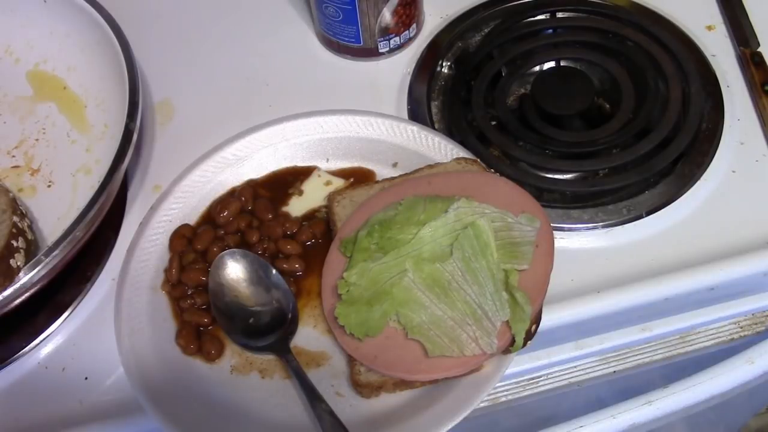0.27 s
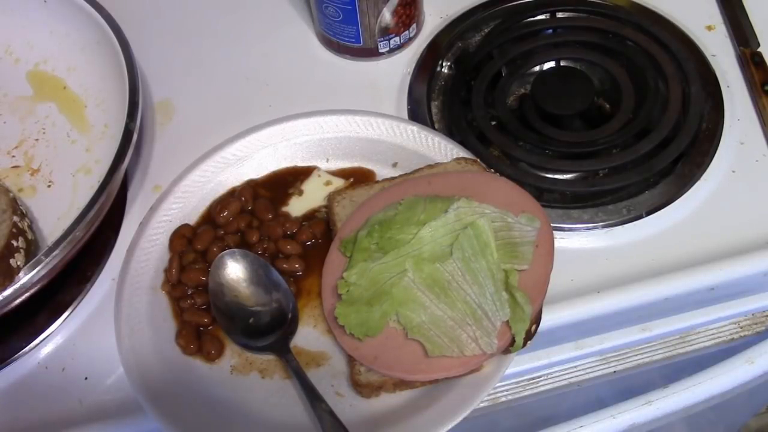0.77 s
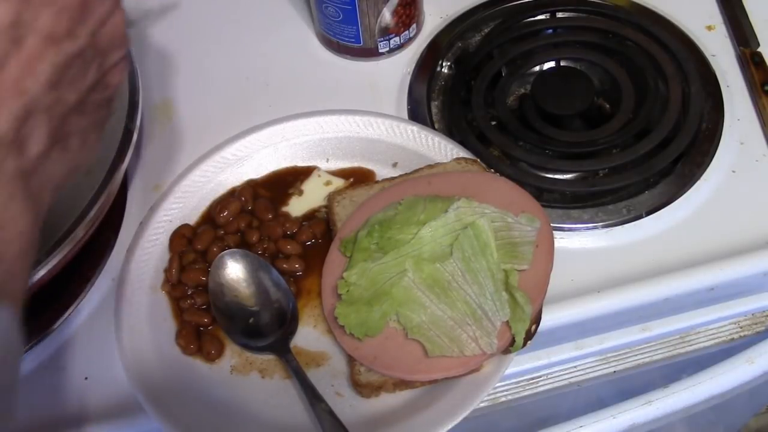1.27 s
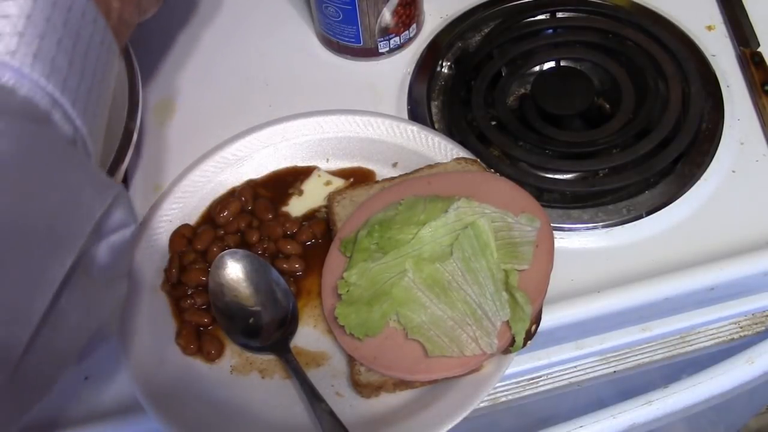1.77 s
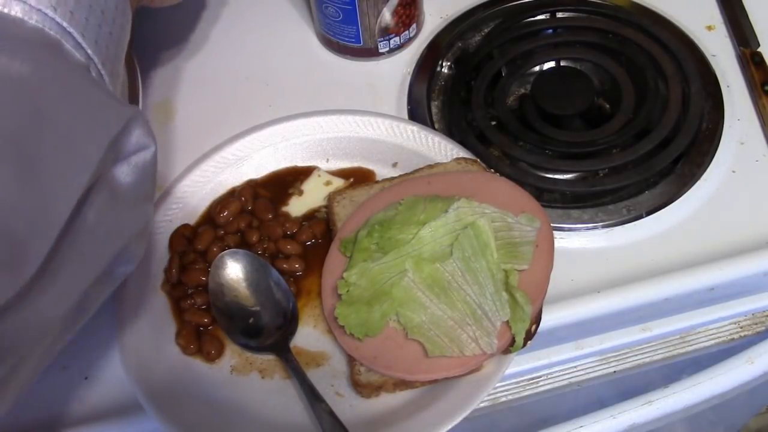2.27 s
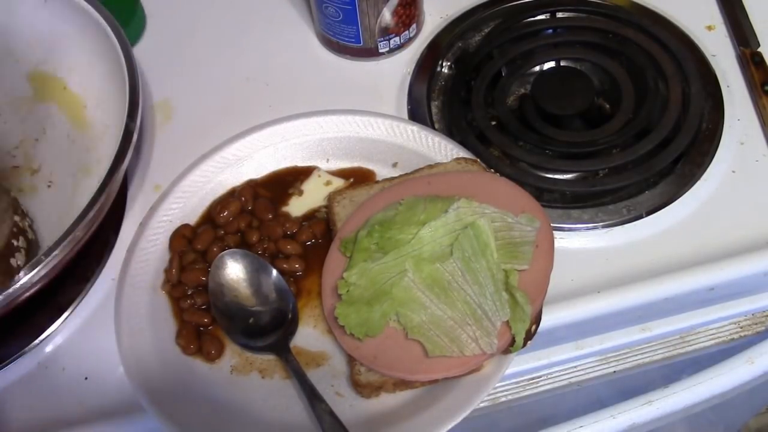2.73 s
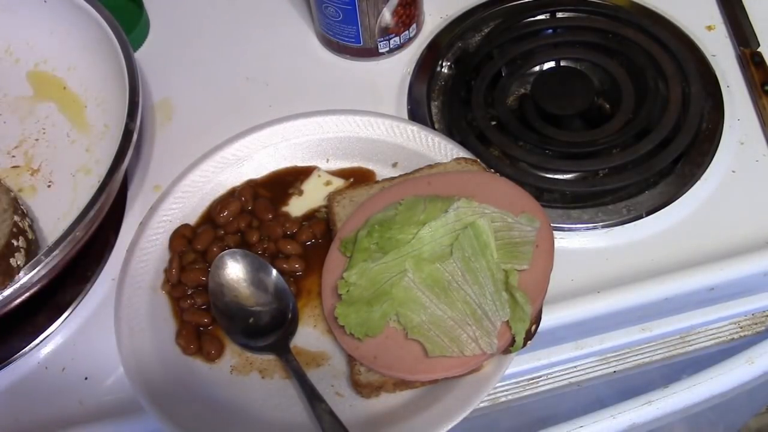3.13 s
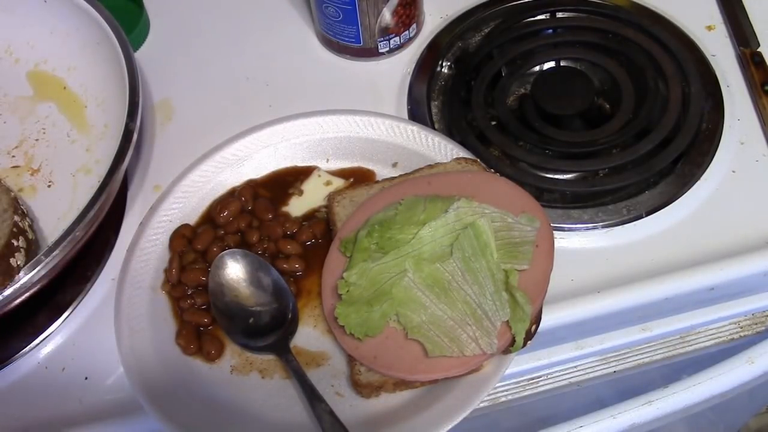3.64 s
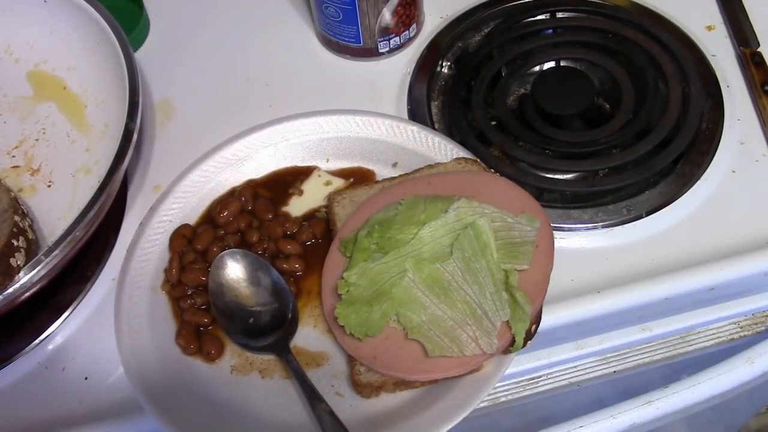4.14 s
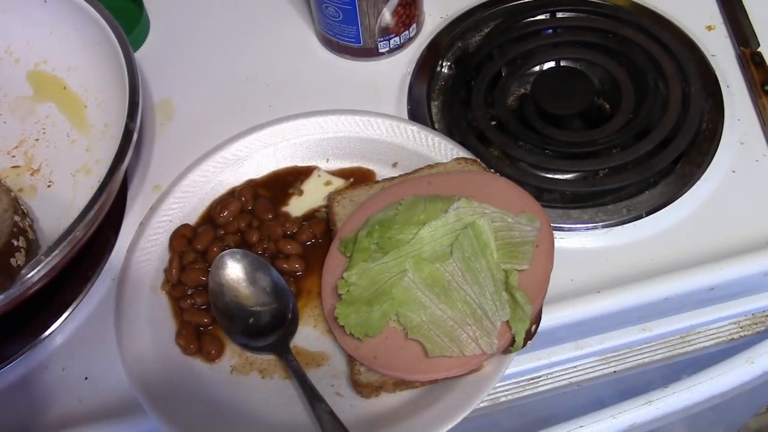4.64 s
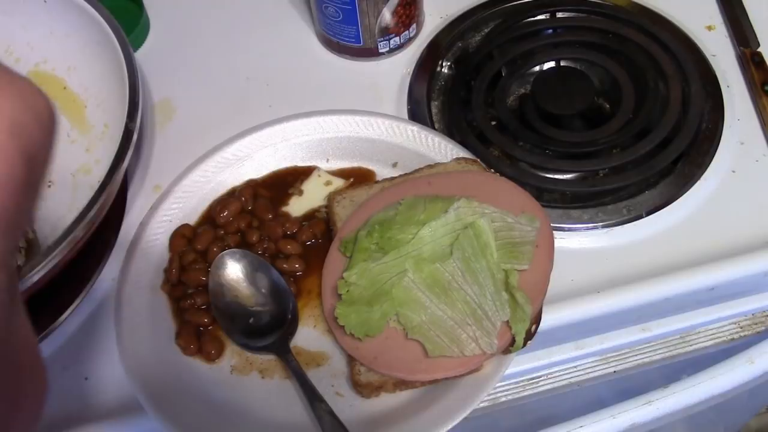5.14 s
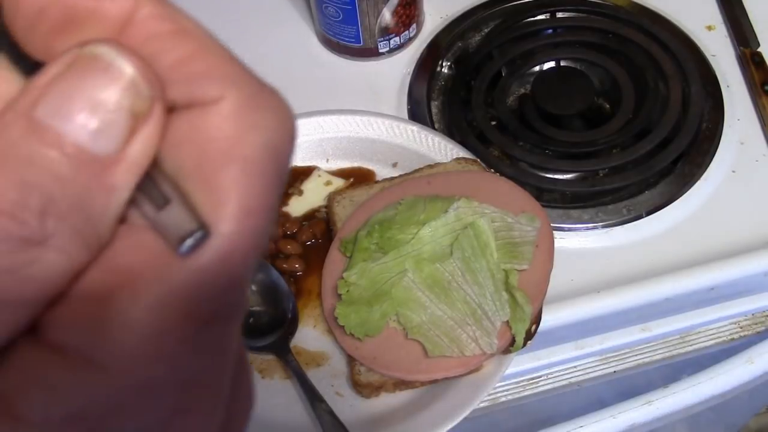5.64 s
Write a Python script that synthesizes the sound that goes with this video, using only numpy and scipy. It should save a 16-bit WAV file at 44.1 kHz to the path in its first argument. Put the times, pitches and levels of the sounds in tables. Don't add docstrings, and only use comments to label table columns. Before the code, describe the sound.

Sleeve rustles and counter bumps lead to spoon taps on a lid and jar rim, then a pan clatters and rocks to rest in a small kitchen.

```python
import sys
import numpy as np
from scipy import signal
from scipy.fft import rfft, irfft, next_fast_len
from scipy.io import wavfile

SR = 44100
rng = np.random.default_rng(int(sys.argv[2]) if len(sys.argv) > 2 else 0)


def gain_from_db(level_db):
    decades = np.asarray(level_db, float) / 20
    return 10 ** decades


def wav_record(signal):
    frames = np.transpose(np.atleast_2d(signal))
    bounded = np.clip(frames, -1, 1)
    quanta = np.round(bounded * 32767).astype(np.int16)
    wavfile.write(sys.argv[1], SR, quanta)


N = 260276

# [pitch_hz, level_db_per_hz]
HUM_COLOUR = [(20, -27), (36, -24), (57, -34), (68, -15), (107, -10), (260, -6), (700, -12), (5380, -27.5),
              (11000, -36), (16000, -47)]
# [pitch_hz, likeness_0_to_1]
HUM_LIKENESS = [(60, 1), (240, 0.36), (950, 0.56), (3770, 0.72), (15000, 0.79)]
# [pitch_hz, level_db]
HUM_TONES = [(118.4, -74.5), (236.9, -77), (473.7, -76), (5561, -85), (11120, -95)]
HUM_DB = -59.5

# [pitch_hz, t60_s]
ROOM_T60 = [(150, 0.24), (1000, 0.24), (4000, 0.19), (12000, 0.17)]
# [pitch_hz, level_db]
ROOM_SIDE = [(200, -20), (1500, -16.5), (5000, -4.5), (12000, -6.0)]
# [pitch_hz, level_db]
PORT_SIDE = [(300, -32.5), (1500, -27), (4000, -18), (8000, -15), (14000, -15)]
ROOM_DB, ROOM_SIDE_DB, LEFT_BIAS_DB = -9.5, -7.5, 0.49
LATE_DB = -26

# [centre_s, peak_db, half_length_s]
CLOTH_SWISHES = [(.046, -59.5, .02), (0.27, -41, 0.022), (0.382, -44.5, 0.036), (.509, -47, 0.014),
                 (.641, -47.5, 0.02), (.716, -50.5, 0.019), (0.785, -48.5, 0.018), (.828, -42.5, .012),
                 (0.968, -52, 0.018), (1.205, -55, 0.037), (1.307, -57.5, .044), (4.622, -56.5, .017),
                 (4.941, -59.5, .03), (5.037, -62, 0.033)]
# [pitch_hz, level_db_per_hz]
CLOTH_COLOUR = [(1180, -39), (2000, -18), (2300, -3.5), (4450, -7.5), (7250, -6.5), (11800, -13),
                (16000, -25)]
QUICK_TILT_DB, DULLING_DB_PER_S = 5.5, 227

# [start_s, end_s, level_db]
SLEEVE_DRAGS = [
    (.26, .33, -58),
    (.41, .53, -58.5),
    (.8, .9, -67.5),
    (.93, 1.035, -51),
    (1.08, 1.36, -77),
]
# [pitch_hz, level_db_per_hz]
DRAG_COLOUR = [(130, -32), (337, 5.5), (589, -9), (1180, -0.5), (1460, -20), (1770, 1), (2360, -15),
               (15000, -34)]
# [start_s, end_s, level_db]
JAR_RUBS = [
    (5.24, 5.34, -63.5),
    (5.65, 5.69, -64),
]
JAR_AIR_HZ = 714
RISE_DB_PER_S, FALL_DB_PER_S = 400, 448

# [time_s, level_db]
PAN_GRIND = [
    (2.13, -49),
    (2.175, -23.5),
    (2.3, -37),
    (2.42, -50),
    (2.52, -44),
    (2.702, -45.5),
    (2.98, -43.5),
    (3.06, -35.5),
    (3.145, -34),
    (3.2, -55),
]
# [pitch_hz, level_db_per_hz]
GRIND_COLOUR = [(88, -22), (220, -17), (335, -2), (500, 2), (590, -6), (760, 1), (1300, -14), (4000, -28.5),
                (8800, -100)]

# [start_s, peak_db, ring_db against the crack, chatter_t60_s, tilt_db_per_octave]
COUNTER_KNOCKS = [
    (.249, -37, -9, .096),
    (.281, -37, -1, 0.053),
    (.4355, -17, -11, 0.045, .5),
    (.461, -30, -1, 0.044),
    (.517, -38, -5, 0.025),
    (.916, -27.5, -6, 0.05, -1.2),
    (.95, -36, 2, 0.075),
    (.995, -38, -23, 0.14),
    (1.111, -42.5, -10, 0.031),
]
LID_TAPS = [
    (1.389, -9.5, -3, .033, -.3),
    (1.414, -11, -3, .036, 1.2),
    (1.444, -19.5, -1, .04, -1),
    (1.523, -10.5, -4, .045),
    (1.562, -16, -3, .045, .3),
]
RIM_TAPS = [
    (1.775, -12.5, 0),
    (1.806, -11.5, -2),
    (1.902, -11, -1),
    (1.9195, -7.5, 0),
    (1.927, -8, -2),
    (1.933, -11, -3),
    (1.9375, -9.5, -7),
    (1.949, -23, -4),
]
PAN_DROP = [
    (2.1252, -2, 11, .03, -1.5),
    (2.142, -3, 8, .07, -.5),
    (2.154, -5, 8, .07, -1.5),
]
PAN_SETTLE = [
    (2.129, -17, -12, .08, 1.5),
    (2.137, -10, -20, .09, 2),
    (2.164, -11, -14, 0.06, -2.5),
    (2.172, -15.5, -10, .035),
    (2.191, -22.5, -7, 0.25),
    (2.21, -27, -9, .03, 3),
    (2.2385, -11.5, 1, 0.06, -2.5),
    (2.247, -14, 3, 0.04, -1.5),
    (2.292, -8, -4, 0.11, -1.8),
]
PAN_ROCK = [(2.468, -13, -9, .05, .4), (2.4745, -4.5, -7, .105, .6), (2.599, -21, -6, .05, -.3),
            (2.604, -3.5, -4, .095, .2), (2.7145, -8, -5, .1, .2), (2.811, -13, -3, .1, -.8),
            (2.893, -13, -5, .085, -.3), (2.96, -15.5, -7, .08, 0), (3.018, -16.5, -5, .07, .2),
            (3.056, -20.5, -7, .09, -1), (3.072, -18, -7, .08, -.5), (3.103, -36, -9, .08, -1),
            (3.134, -42, -9, .06, -2)]
JAR_TAPS = [
    (3.205, -9.5, -2, .07, .5),
    (3.219, -20, 6, .06),
    (3.299, -39, 12),
]
SPOON_TAPS = [
    (3.3355, -12.5, -4),
]
SPOON_REST = [
    (3.548, -21.5, -12, .04),
    (3.562, -30.5, -12),
]
SOFT_TICKS = [
    (1.0395, -25, -2, .012, -1.5),
    (1.045, -31.5, 12),
    (5.321, -37),
]
FAINT_TICKS = [
    (.2034, -52),
    (4.621, -58),
    (3.5079, -52),
    (3.8077, -55.5),
    (3.8918, -47),
    (3.9285, -47.5),
    (4.9294, -56),
    (5.1594, -60),
    (5.2594, -52),
    (5.844, -53),
]
GLASS_TICKS = [
    (4.693, -37.5, 2, .015),
    (4.8, -27, 5),
]
SHOULDER_TICK = [
    (5.485, -20, 1.5, .022, .3),
]
# [ring_db against the crack, chatter_t60_s, tilt_db_per_octave]
TOUCH = dict(counter=(-8, .05, 0.11), lid=(-1.9, 0.033, 0.24), rim=(0, 0.019, 0.76), drop=(7, 0.043, 0.61),
         settle=(-5, .08, -0.66), rock=(-9, 0.082, -0.24), jar=(0, 0.043, .9), glass=(0.62, 0.02, -0.52),
         soft=(7.7, 0.0094, -3.5), rest=(-5, 0.032, -1.7), spoon=(-6.5, 0.031, 0.55),
         faint=(3.5, 0.015, -.6))
LID_ECHO_S, RIM_ECHO_S = .00192, .00155
RUN_UP_S, ROLL_IN_S = 0.00045, 0.0037

# [pitch_hz, level_db, t60_s]
COUNTER_MODES = [(267, 20.5, 0.52), (710, -4, 0.52), (1460, -47.5, 0.11), (1760, 13, 5.0),
                 (2060, -6, 0.058), (3110, -22, 0.052), (4759, -24, 0.21), (5320, -10, 0.15)]
# [pitch_hz, level_db, t60_s]
LID_MODES = [(1044, -13, .12), (1500, -9, .05), (1930, -6, .15), (2400, -2, .06), (2620, -2, .06),
             (3140, -3, .05), (3600, -12, .035), (4130, -3, .035), (4690, -12, .05), (5200, -15, .04),
             (5680, -13, .04), (6450, -17, .05), (7020, -15, .06), (8060, -20, .04), (9400, -22, .04)]
# [pitch_hz, level_db, t60_s]
RIM_MODES = [(520, -21, .08), (960, -10, .1), (1100, -6, .12), (1790, -4, .09), (1890, 0, .13),
             (2030, -9, .1), (2200, -7, .16), (2700, -9, .05), (3250, -10, .04), (4000, -13, .05),
             (4900, -12, .05), (5200, -19, .14), (6350, -16, .05), (7000, -15, .07)]
# [pitch_hz, level_db, t60_s]
PAN_MODES = [(345, -17, .14), (511, -14, .14), (765, -11, .12), (940, -7, .1), (1050, 0, .12),
             (1110, -4, .1), (1163, -2, .12), (1640, -16, .08), (2200, -14, .06), (2500, -15, .04),
             (3200, -18, .03), (3600, -17, .03), (4200, -17, .03)]
# [pitch_hz, level_db, t60_s]
EDGE_MODES = [(520, -11, .08), (880, -13, .08), (1190, -2, .08), (1380, 0, .1), (1510, -1, .1),
              (1780, -3, .07), (2050, -4, .07), (2560, -6, .05), (2830, -2, .06), (3350, -5, .04),
              (3800, -9, .04), (4500, -13, .04)]
# [pitch_hz, level_db, t60_s]
JAR_MODES = [(452, -10, .1), (705, -1, .28), (775, -3, .16), (1100, -5, .07), (1900, -18, .06),
             (2692, -8, .07), (2900, -9, .04), (4400, -13, .04), (4600, -13, .05), (5670, -19, .07),
             (6330, -20, .06), (7080, -19, .06), (8600, -18, .06), (9380, -21, .05), (11190, -28, .12),
             (14060, -36, .18)]
# [pitch_hz, level_db, t60_s]
SPOON_MODES = [(660, -9, .1), (1260, -9, .08), (1550, -8, .08), (1970, -4, .14), (2140, -7, .14),
               (2725, -1, .09), (3080, -6, .06), (3600, -10, .04), (5150, -13, .1), (6930, -19, .1),
               (8100, -21, .1), (10400, -23, .06), (11300, -22, .12), (14070, -24, .24)]
# [pitch_hz, level_db, t60_s]
SHOULDER_MODES = [(400, -12, .05), (740, 0, .2), (900, -8, .04), (1740, -17, .04), (2120, -12, .04),
                  (2420, -9, .04), (2800, -15, .03), (3630, -14, .03), (4020, -16, .03), (4490, -18, .03),
                  (5190, -21, .03), (7910, -24, .03)]
# [pitch_hz, level_db, t60_s]
GLASS_MODES = [(330, -14, .08), (445, -12, .08), (685, 0, .22), (950, -9, .04), (1700, -16, .04),
               (2150, -18, .04), (2580, -5, .03), (2740, -15, .04), (3660, -16, .04), (4210, -7, .02),
               (5900, -20, .04), (8500, -21, .04)]

# [pitch_hz, level_db_per_hz]
COUNTER_CRACK = [(71, -37.5), (120, -26), (278, 3.5), (1090, -0.5), (2200, -3.5), (3520, -11),
                 (12000, -28.5), (16000, -46)]
# [pitch_hz, level_db_per_hz]
LID_CRACK = [(120, -53), (380, -10), (1070, -14.5), (2240, -10), (3110, -1), (3660, -9), (4200, -2.5),
             (9400, -34.5), (16000, -56)]
# [pitch_hz, level_db_per_hz]
RIM_CRACK = [(300, -45), (1070, -8), (1500, -22), (1900, 6), (2430, -1), (6630, -16.5), (13300, -48.5),
             (16000, -86)]
# [pitch_hz, level_db_per_hz]
PAN_CRACK = [(250, -41.5), (320, -10), (513, -12), (557, -15), (1140, 3.5), (1290, 4), (7500, -15),
             (16000, -32)]
# [pitch_hz, level_db_per_hz]
EDGE_CRACK = [(120, -33), (334, -20.5), (656, -16.5), (1460, -1.5), (1860, -3.5), (3900, -6),
              (11500, -31.5), (16000, -56)]
# [pitch_hz, level_db_per_hz]
JAR_CRACK = [(150, -30), (320, -8), (1000, -2), (1700, -17), (2930, -12), (3660, -12), (4140, -21),
             (8840, -20.5), (16000, -34)]
# [pitch_hz, level_db_per_hz]
SPOON_CRACK = [(71, -56), (120, -26), (341, 1), (1550, -5), (2750, 2), (4320, -7), (11500, -19),
               (16000, -53)]
# [pitch_hz, level_db_per_hz]
GLASS_CRACK = [(120, -42), (789, -5.5), (1490, -23), (2430, -16), (3170, -21.5), (4060, -19.5),
               (8840, -26.5), (16000, -44)]

OPPOSITE = np.array([[1], [-1]])


def rms_one(x):
    return x / np.sqrt(np.mean(x ** 2) + 1e-20)


def at_hz(points, hz):
    p = np.array(points)
    return np.interp(np.log(np.maximum(hz, 1)), np.log(p[:, 0]), p[:, 1])


def colour(x, spectrum, tilt_db=0.):
    size = next_fast_len(x.shape[-1] + 4096)
    hz = np.arange(size // 2 + 1) * SR / size
    octaves = np.log2(np.clip(hz, 100, None) / 2000)
    level_db = at_hz(spectrum, hz) + tilt_db * octaves
    cepstrum = irfft(level_db * np.log(10) / 20, size)
    cepstrum[1:size // 2] *= 2
    cepstrum[size // 2 + 1:] = 0
    response = np.exp(rfft(cepstrum))
    return irfft(rfft(x, size) * response, size)[..., :x.shape[-1]]


def drift(rate_hz):
    r = np.exp(-2 * np.pi * rate_hz / SR)
    noise = rng.standard_normal(N + SR)
    return rms_one(signal.lfilter([1], [1, -2 * r, r * r], noise)[SR:])


def ring(force, hz, t60):
    r = gain_from_db(-60 / (max(t60, .005) * SR))
    w = 2 * np.pi * hz / SR
    return signal.lfilter([0, np.sin(w)], [1, -2 * r * np.cos(w), r * r], force + 1e-18)


def hum():
    size = next_fast_len(N)
    hz = np.arange(size // 2 + 1) * SR / size
    alike = np.clip(at_hz(HUM_LIKENESS, hz), 0, 1)
    mid, side = rfft(rng.standard_normal((2, size))) * gain_from_db(at_hz(HUM_COLOUR, hz))
    pair = irfft(np.sqrt(1 + alike) * mid + np.sqrt(1 - alike) * side * OPPOSITE, size)[:, :N]
    t, wander = np.arange(N) / SR, 0.27 * drift(3)
    tones = sum(np.sqrt(2) * gain_from_db(db) * np.sin(2 * np.pi * hz * t + wander) for hz, db in HUM_TONES)
    return gain_from_db(HUM_DB + 0.66 * drift(4.2)) * rms_one(pair) + tones


def kitchen(x):
    t = np.arange(SR // 2) / SR
    tail = np.zeros((2, len(t)))
    for low in 80 * 2. ** np.arange(8):
        band = signal.butter(2, [low, min(2 * low, .45 * SR)], "band", fs=SR, output="sos")
        decay_db = -60 * t / at_hz(ROOM_T60, np.sqrt(2) * low)
        decay = gain_from_db(decay_db) + gain_from_db(LATE_DB + decay_db / 2)
        tail += signal.sosfilt(band, rng.standard_normal(tail.shape)) * decay
    tail *= np.clip((t - .003) / 0.0015, 0, 1)
    tail /= np.sqrt(np.sum(tail[0] ** 2))
    mid, side = signal.fftconvolve(x[None], tail, axes=1)[:, :N]
    return mid + gain_from_db(ROOM_SIDE_DB) * colour(side, ROOM_SIDE) * OPPOSITE


def cloth_swishes():
    out, half = np.zeros((2, N)), 2000
    t = np.arange(-half, 2 * half) / SR
    for s, peak_db, length in CLOTH_SWISHES:
        mid, side = rng.standard_normal((2, len(t)))
        tilt_db = QUICK_TILT_DB - DULLING_DB_PER_S * length
        puff = rms_one(colour(mid + 0.25 * side * OPPOSITE, CLOTH_COLOUR, tilt_db))
        swell = np.exp(-(t / np.where(t < 0, length, 1.78 * length)) ** 2)
        start = round(s * SR) - half
        out[:, start:start + len(t)] += gain_from_db(peak_db - 11.5) * puff * swell
    return out


def strokes(rows):
    t, gain = np.arange(N) / SR, np.zeros(N)
    for start, end, db in rows:
        rise_db = RISE_DB_PER_S * np.maximum(start - t, 0)
        fall_db = FALL_DB_PER_S * np.maximum(t - end, 0)
        gain += gain_from_db(db - rise_db - fall_db)
    return gain


def rub(gain, tone, bump_db, bumps_per_s):
    bumpy = rng.standard_normal(N) * gain_from_db(bump_db * drift(bumps_per_s))
    return gain * rms_one(colour(bumpy, tone))


def sleeve_drag():
    return rub(strokes(SLEEVE_DRAGS), DRAG_COLOUR, 2.8, 99)


def jar_rub():
    return strokes(JAR_RUBS) * rms_one(ring(rng.standard_normal(N), JAR_AIR_HZ, 0.082))


def pan_grind():
    s, db = np.transpose(PAN_GRIND)
    gain = gain_from_db(np.interp(np.arange(N) / SR, s, db, -130, -130))
    return rub(gain, GRIND_COLOUR, 3.9, 60)


def contact_force(t, lead, chatter, first, run_up):
    rise = np.exp(t / max(run_up, 5e-5)) * .5
    shape = np.where(t < 0, rise, gain_from_db(-60 * t / max(chatter, .002)))
    grit = rng.standard_normal(len(t)) * gain_from_db(3.5 * rng.standard_normal(len(t)))
    force = shape * grit
    force[lead:lead + 3] += first * np.array([.4, .6, .4])
    return force


def ring_body(force, modes, longest, tilt_db):
    spread, detune = rng.standard_normal((2, len(modes))) * [[1.5], [.004]]
    body = 0
    for (hz, db, t60), d, e in zip(modes, spread, detune):
        mode = ring(force, hz * (1 + e), min(t60 / 2, longest))
        mode = mode + .5 * ring(force, hz * (.988 - e), min(t60 / 3, longest))
        body = body + gain_from_db(db + d + tilt_db * np.log2(hz / 2000)) * mode / np.abs(mode).max()
    return signal.sosfilt(signal.butter(2, .8 * modes[0][0], "high", fs=SR, output="sos"), body)


def blows(events, touch, modes, crack, longest, first, run_up=RUN_UP_S, share=0., echo_s=0.):
    out, lead = np.zeros(N + SR), 1024
    t = (np.arange(SR // 4) - lead) / SR
    for s, peak_db, *own in events:
        ring_db, chatter, tilt_db = *own, *TOUCH[touch][len(own):]
        force = contact_force(t, lead, chatter, first, run_up)
        body = ring_body(force, modes, longest, tilt_db)
        echoed = force + share * np.roll(force, round(echo_s * SR))
        sound = rms_one(colour(echoed, crack, tilt_db)) + gain_from_db(ring_db) * rms_one(body)
        start = round((s + .0012) * SR) - lead
        out[start:start + len(t)] += gain_from_db(peak_db) * sound / np.abs(sound).max()
    return out[:N]


def counter_knocks():
    return blows(COUNTER_KNOCKS, "counter", COUNTER_MODES, COUNTER_CRACK, longest=.06, first=9)


def small_ticks():
    ticks = blows(GLASS_TICKS, "glass", GLASS_MODES, GLASS_CRACK, longest=.11, first=6)
    ticks += blows(SHOULDER_TICK, "glass", SHOULDER_MODES, GLASS_CRACK, longest=.1, first=6)
    ticks += blows(SOFT_TICKS, "soft", GLASS_MODES[2:8], COUNTER_CRACK, longest=.11, first=12)
    ticks += blows(FAINT_TICKS, "faint", GLASS_MODES[5:9], GLASS_CRACK, longest=.015, first=6)
    return ticks


def jar_and_spoon_down():
    down = blows(JAR_TAPS, "jar", JAR_MODES, JAR_CRACK, longest=.14, first=3)
    down += blows(SPOON_TAPS, "spoon", SPOON_MODES, SPOON_CRACK, longest=.13, first=4)
    down += blows(SPOON_REST, "rest", RIM_MODES[:9], SPOON_CRACK, longest=.04, first=5)
    return down


def spoon_taps():
    taps = blows(LID_TAPS, "lid", LID_MODES, LID_CRACK, longest=.035, first=9, share=1.1, echo_s=LID_ECHO_S)
    taps += blows(RIM_TAPS, "rim", RIM_MODES, RIM_CRACK, longest=.06, first=8, share=.9, echo_s=RIM_ECHO_S)
    return taps


def pan():
    hits = blows(PAN_DROP, "drop", PAN_MODES, PAN_CRACK, longest=.07, first=12, run_up=.0002)
    hits += blows(PAN_SETTLE, "settle", EDGE_MODES, PAN_CRACK, longest=.025, first=4)
    hits += blows(PAN_ROCK, "rock", EDGE_MODES, EDGE_CRACK, longest=.05, first=3, run_up=ROLL_IN_S)
    return hits


def scene():
    near = sleeve_drag() + jar_rub() + pan_grind()
    near += counter_knocks() + small_ticks() + jar_and_spoon_down() + spoon_taps() + pan()
    unequal = colour(np.roll(near, 40), PORT_SIDE) * OPPOSITE
    heard = near + unequal + gain_from_db(ROOM_DB) * kitchen(near)
    rounded = .52 * np.tanh(heard / .52)
    thin = signal.sosfilt(signal.butter(3, 135, "high", fs=SR, output="sos"), rounded)
    return (thin + cloth_swishes() + hum()) * gain_from_db(LEFT_BIAS_DB * OPPOSITE)


def roll_off(x):
    return signal.sosfilt(signal.butter(12, 16500, fs=SR, output="sos"), x)


def record(dry):
    cut = signal.cheby2(10, 50, 16600, fs=SR, output="sos")
    mix = signal.sosfilt(cut, dry)
    return roll_off(mix)


dry = scene()
out = record(dry)
wav_record(out)
```